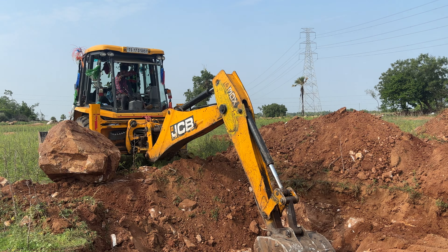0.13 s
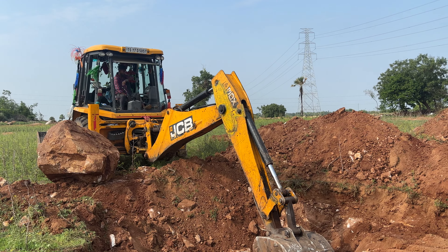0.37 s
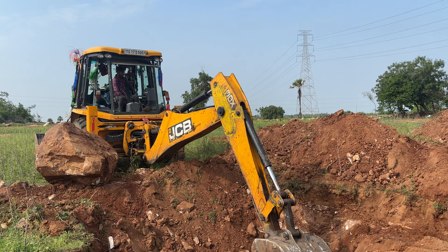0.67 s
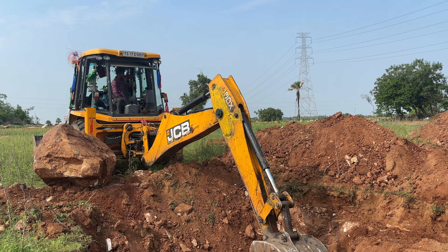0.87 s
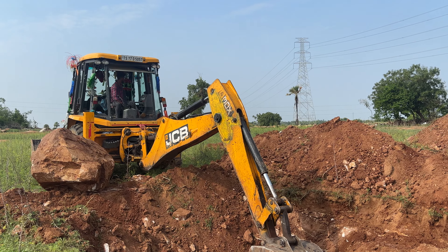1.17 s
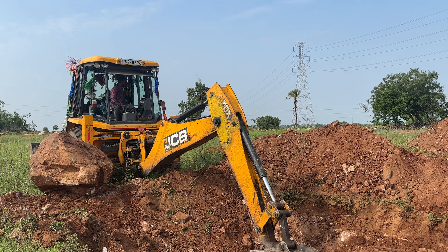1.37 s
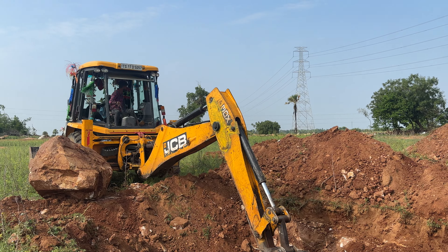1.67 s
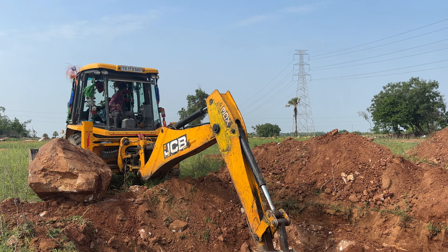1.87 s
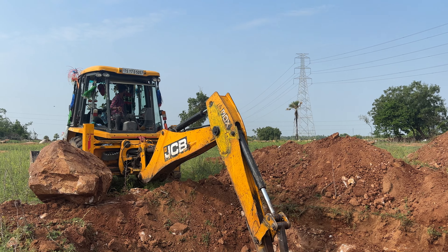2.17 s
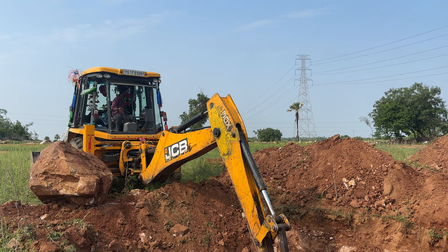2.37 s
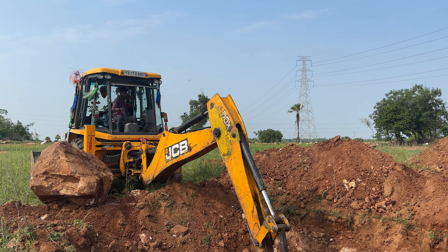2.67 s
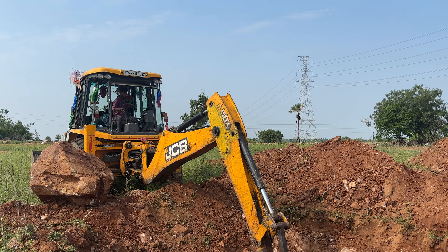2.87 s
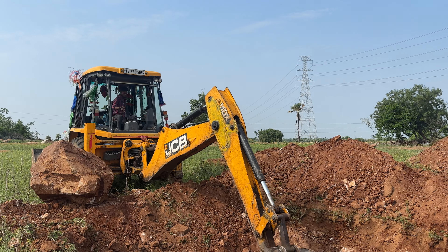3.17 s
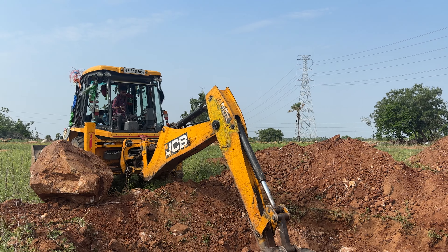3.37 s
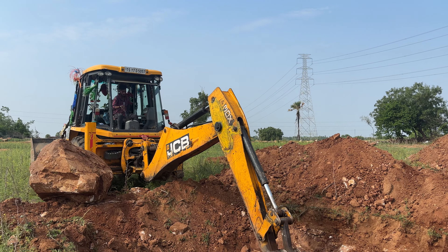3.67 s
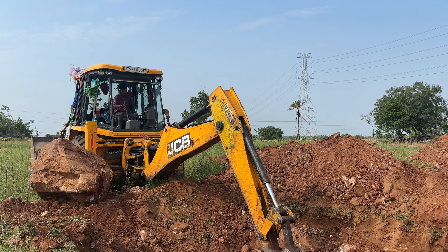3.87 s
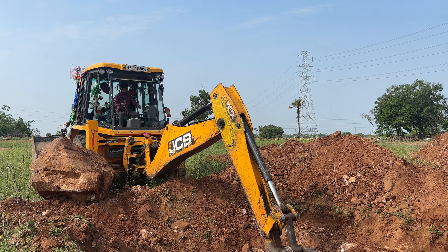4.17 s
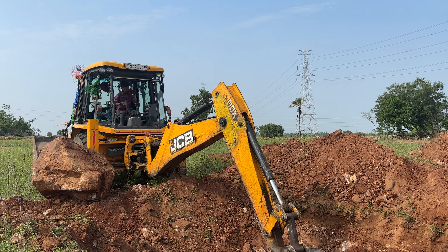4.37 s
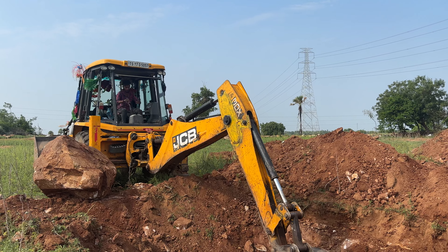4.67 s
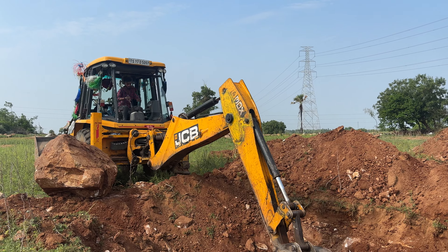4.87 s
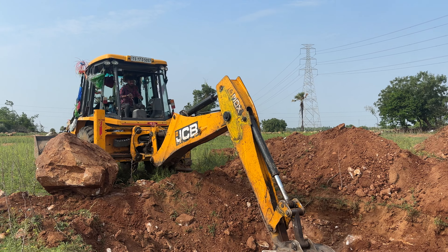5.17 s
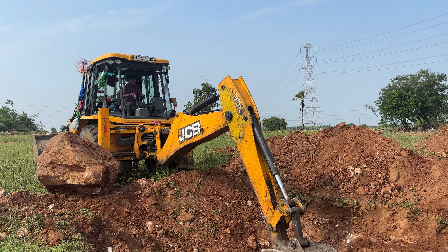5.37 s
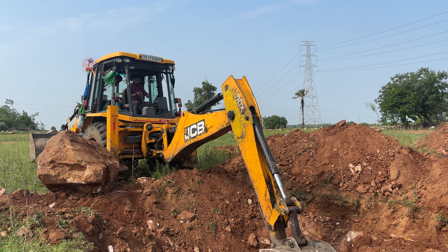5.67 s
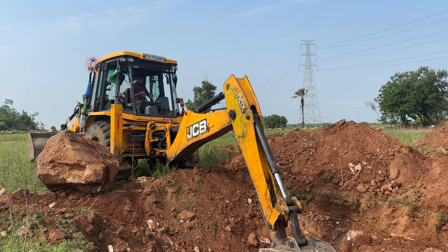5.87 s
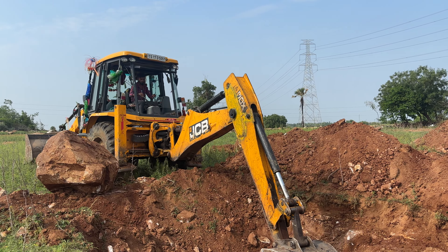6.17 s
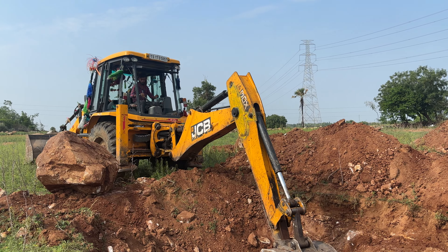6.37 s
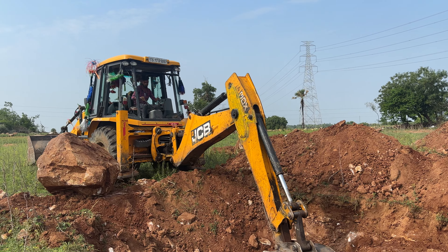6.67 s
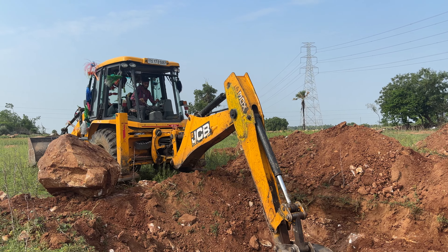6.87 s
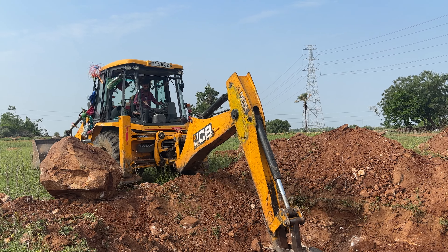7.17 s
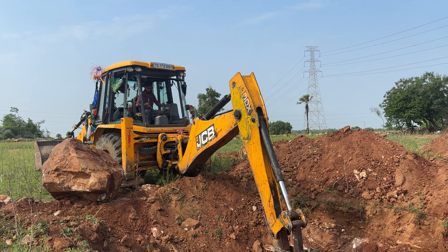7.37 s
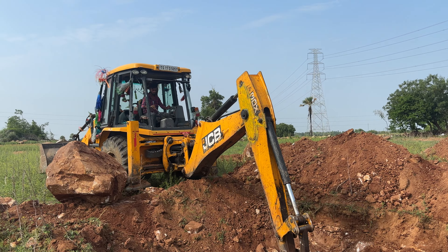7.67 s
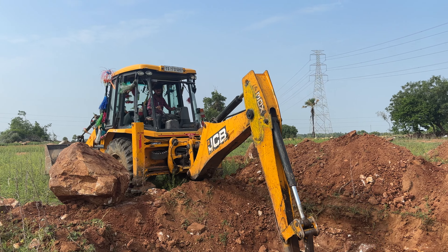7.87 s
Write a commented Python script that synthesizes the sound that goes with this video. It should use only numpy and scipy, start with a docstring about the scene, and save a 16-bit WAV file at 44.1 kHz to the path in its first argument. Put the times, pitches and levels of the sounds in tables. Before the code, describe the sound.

Gusty wind rumbles, thumps and slaps on a phone microphone in an open field for the whole eight seconds, and is the loudest sound. Beneath it, some way off, a diesel digger drones steadily with faint, shifting hydraulic whines. A soft rustle and a tick pass in the first two seconds, and near 2 seconds a thin, slightly wavering pump tone joins. After a light knock at about 3.7 seconds, the steel bucket hits rock in a quick cluster from 4.6 to 5.4 seconds, grinding and ringing, with two brief high squeaks. The engine is slightly louder from here. From about 5.5 seconds, small metal links clink lightly close by, mixed with faint, very high, short chirps until around 7.3 seconds. A few lighter bucket knocks fall between 7 and 8 seconds, as wind and engine continue.

```python
"""A diesel digger works a rock in an open field, some way from a phone held in gusty wind.
From the start, wind rumbles and slaps on both microphone ports while the engine drones and hydraulics whine.
A faint rustle and a tick pass early on, and near 2 s the main pump's gear tone joins in.
The steel bucket knocks on stone, hardest from 4.6 to 5.4 s, grinding, ringing and squeaking. Then small
metal links clink close by, something chirps thinly, and a few lighter knocks follow."""
import sys
import numpy as np
from scipy import signal
from scipy.fft import rfft, irfft
from scipy.io import wavfile
from scipy.ndimage import uniform_filter1d

SR = 44100
rng = np.random.default_rng(int(sys.argv[2]) if len(sys.argv) > 2 else 0)


def dump_mix(stems):
    """Bounce the given channels to the path in sys.argv[1] as a 16-bit WAV at rate SR."""
    frames = np.atleast_2d(stems).T  # one column per channel
    limited = np.clip(frames, -1, 1)  # hard clip at full scale
    pcm = np.round(limited * 32767).astype(np.int16)
    wavfile.write(sys.argv[1], SR, pcm)


N = 353329

# wind strength at the ports: time_s, rumble_db, roar_db
WIND_LEVELS = [(0.0, -29, -28), (0.36, -34.5, -42.5), (1.03, -25, -42), (1.2, -30.5, -26.5),
               (1.45, -32, -34.5), (1.72, -21.5, -30), (2.16, -25.5, -27), (2.27, -23.5, -30),
               (3.14, -24, -31.5), (3.41, -25.5, -30.5), (3.72, -25.5, -32), (4.42, -21, -25.5),
               (4.82, -20, -25.5), (5.08, -26, -37), (5.64, -22, -30.5), (5.73, -21, -29.5),
               (6.2, -25, -32.5), (6.4, -28.5, -37.5), (7.34, -31.5, -38.5), (8.01, -20.5, -31.5)]
# tone colour of the wind's low rumble and its higher roar: pitch_hz, level_db
RUMBLE_COLOUR = [(20, -15), (40, 3), (70, -3), (120, -1.5), (220, -6.5), (400, -24.5), (800, -75)]
ROAR_COLOUR = [(80, -62), (200, -9.5), (350, -4), (600, -9), (850, -14), (1300, -31.5), (2500, -85)]
# how alike the wind is left and right: pitch_hz, likeness (1 = the same)
WIND_LIKENESS = [(60, 0.17), (130, 0.43), (290, 0.69), (640, 0.92), (900, 0.63), (1400, 0.78)]
# lift or cut of the rumble's upper part: time_s, gain_db
UPPER_RUMBLE = [(0, 0), (.7, -1.5), (1.4, 1), (2.1, -2.5), (2.8, -1), (3.4, -3), (4, -8), (4.6, -1),
                (5.3, 3), (6, -0.5), (6.7, 5), (7.4, 3.5), (8, 0.5)]
# heavy, low shoves of air: time_s, peak_db, pitch_hz
WIND_BUFFETS = [(0.017, -24, 115), (0.993, -15, 61.9), (1.14, -24, 93), (1.46, -11, 90),
                (1.515, -10.5, 82.5), (1.655, -13.5, 123.6), (1.777, -19, 85.6), (2.248, -18, 59.2),
                (2.383, -7, 81.8), (2.684, -15, 61), (2.809, -22, 67.3), (3.194, -17, 62.3),
                (3.502, -14, 73), (3.928, -16, 49), (4.098, -17, 90), (4.3, -18, 153), (4.603, -12.5, 82.6),
                (4.678, -13, 115), (4.833, -11, 75.7), (5.268, -10, 128.4), (5.575, -16, 78.5),
                (5.8, -13, 72), (5.939, -24, 51.1), (6.039, -16, 77.5), (6.129, -20, 50.3),
                (6.176, -14, 53.5), (6.299, -9, 50.4), (6.359, -32, 166), (6.589, -19, 92),
                (6.884, -21, 83.4), (6.979, -17, 117), (7.04, -14, 53.8), (7.239, -20, 122),
                (7.648, -18, 73), (7.939, -21, 103)]
# strong eddies (swirls of air): start_s, level_db, pitch_hz, thump_db, snap_db (last two added to level)
STRONG_EDDIES = [(0.019, -23, 340, 0, -11), (0.123, -25, 384, -11, -5), (0.991, -16, 339, -9, -9),
                 (1.08, -23.5, 247, -1, -5), (1.152, -17, 510, -11, -4), (1.21, -24.5, 487, -4, -3),
                 (1.312, -24, 495, -14, 0), (1.381, -20, 450, -14, 4), (1.447, -20.5, 269, -9, 2),
                 (1.524, -9.5, 304, -10, -2.5), (1.659, -8, 318, -14, 6), (1.897, -17.5, 240, -7, -12),
                 (1.98, -13.5, 284, -18, -1), (2.014, -19, 400, -11, 7), (2.134, -15.5, 246, -4, 5),
                 (2.201, -30, 418, 6, -6.5), (2.244, -16, 296, -2, -16), (2.319, -14.5, 371, -15, 5.5),
                 (2.394, -19, 450, 3.5, -5), (2.486, -18.5, 470, -1, -5), (2.651, -15, 380, -17, -8),
                 (2.788, -18, 435, -3, -8), (2.899, -10, 520, -2, 1.5), (3.055, -18.5, 503, -7, 2),
                 (3.16, -18, 397, -3, -10), (3.211, -18.5, 520, 2, -3), (3.245, -15, 433, -14, -4),
                 (3.317, -16.5, 540, -10, -1), (3.358, -22, 470, -16, -9), (3.479, -15, 387, -14, -5),
                 (3.553, -10, 538, -13, 2.5), (3.616, -12.5, 415, -7, 5), (3.752, -27.5, 510, 11, -8),
                 (3.794, -17.5, 555, -4, -6.5), (3.936, -11.5, 547, -8, -5), (4.107, -14, 456, -9, -6.5),
                 (4.147, -18, 662, -6, 0), (4.227, -17, 594, -12, -1), (4.261, -14, 510, -9, -14),
                 (4.353, -12, 590, -18, 0), (4.405, -22, 545, -9, -6.5), (4.445, -8, 570, -6.5, -2),
                 (4.64, -19, 590, 4, -12), (4.787, -19.5, 415, -13, -10), (4.825, -15.5, 435, -10, 4),
                 (4.924, -13.5, 302, 4, -7), (5.058, -20.5, 315, 6, -6.5), (5.157, -11.5, 250, -20, -5),
                 (5.193, -12, 450, -8, -5), (5.262, -14, 480, -10, -5), (5.278, -10.5, 404, -5.5, 6),
                 (5.297, -11, 510, -10, 1), (5.305, -22, 500, -8, 3), (5.428, -16, 304, -1, -14),
                 (5.465, -13, 430, -18, -4), (5.555, -11, 510, -6, 8), (5.701, -16, 443, 2, -9),
                 (5.743, -10, 480, -22, -9), (5.829, -8.5, 570, -19, 0), (5.875, -16.5, 250, -22, 6),
                 (5.922, -9.5, 362, -10, -9), (6.101, -14, 224, 0, 5), (6.15, -16, 394, -5, -2),
                 (6.274, -18, 530, -7, 5), (6.364, -10.5, 262, -20, 0), (6.454, -14.5, 410, -5, -3),
                 (6.494, -17, 440, -2, 4.5), (6.613, -10.5, 268, -7, -1.5), (6.709, -18, 540, 0, 1),
                 (6.752, -14.5, 268, -4.5, -4), (6.891, -14, 230, -7, 2.5), (6.985, -12.5, 222, -13, 1),
                 (7.022, -17, 260, -6, 1), (7.182, -25, 760, -19, -11), (7.24, -14.5, 258, -4, 3.5),
                 (7.35, -19.5, 306, -3, -9), (7.499, -13.5, 269, -24, -11), (7.742, -16, 226, -22, -3),
                 (7.775, -17, 252, -19, -4), (7.932, -10.5, 224, -12, -6)]
# thin high chirps: start_s, length_s, level_db, pitch_hz
THIN_CHIRPS = [(5.535, .025, -58, 7870), (5.622, .012, -52, 8100), (5.66, .012, -50, 8150),
               (5.709, .012, -50, 8250), (5.738, 0.016, -40, 8120), (5.776, 0.014, -49, 8150),
               (5.895, .01, -51, 8400), (5.915, .035, -53, 8360), (5.966, .018, -51, 8260),
               (6.005, 0.009, -50, 8300), (6.048, .018, -47, 8260), (6.43, .04, -52, 8370),
               (6.561, 0.033, -41, 8180), (6.662, .014, -54, 8150), (6.822, .02, -54, 8200),
               (7.108, .035, -54, 8080), (7.154, .022, -50, 8200), (7.293, .016, -58, 8150)]
# clinks of the links: start_s, level_db, ring_hz, tick_db (added to level)
LINK_CLINKS = [(2.6656, -52, 7720, 22), (2.8168, -45, 8500, 2.5), (4.0915, -44, 7460, -3),
               (5.4562, -34.5, 9500, 4), (5.6894, -34, 9650, 7), (5.7048, -27, 9600, -9),
               (5.7398, -41, 9600, 8), (5.8507, -32, 9550, 5.5), (5.8808, -29, 9600, 2.5),
               (5.9831, -36, 9840, -8), (6.0050, -46, 9600, 6), (6.408, -31, 9600, 1),
               (6.5077, -33, 9600, 2), (6.647, -37, 9680, 4), (6.7719, -37, 9600, 2), (6.797, -38, 9600, 3),
               (6.804, -28, 9600, -8), (6.821, -38, 9720, 11), (6.9711, -42, 9590, 2),
               (7.2676, -36, 9610, -5), (7.575, -43, 9600, 6), (7.655, -37, 9500, 3),
               (7.8996, -43, 9900, 10), (7.9368, -41, 10060, 0)]
# squeaks of sliding steel: start_s, length_s, level_db
STEEL_SQUEAKS = [(4.765, 0.035, -45), (5.093, 0.051, -35)]
# resonances in a squeak: pitch_hz, width_hz, level_db
SQUEAK_RINGS = [(8200, 430, -2), (10000, 580, 1), (14600, 600, 3)]
# engine loudness: time_s, drone_db, hiss_db
ENGINE_LEVELS = [(0.0, -43.5, -56.5), (1.05, -45.5, -61), (2.56, -42.5, -62), (2.97, -41.5, -60),
                 (3.37, -43, -59), (4.01, -40, -58), (4.31, -43.5, -58), (4.77, -39, -55.5),
                 (5.26, -38.5, -53.5), (5.51, -40, -54.5), (6.27, -39, -53.5), (8.01, -40, -55)]
# tone colour of the engine's drone and hiss: pitch_hz, level_db
DRONE_COLOUR = [(180, -34), (300, 4.5), (472, -22), (630, -44), (723, -14.5), (864, -6), (1110, -1),
                (1400, -15), (1650, -13), (1860, -14), (2230, -15), (2390, -16), (2670, -16), (3660, -21),
                (8000, -36), (10400, -59), (17600, -120)]
HISS_COLOUR = [(4000, -3), (6000, -5.5), (8000, -2.5), (10000, -7), (12500, -2), (14500, -1.5),
               (15200, -10), (16000, -20)]
# how alike the drone is left and right: pitch_hz, likeness
DRONE_LIKENESS = [(300, 0.93), (1000, 0.48), (2000, 0.56), (3500, 0.2), (6000, 0.51), (8000, 0.75)]
# hydraulic whines, silent if the end is before the start: start_s, end_s, pitch_hz, width_hz, level_db
HYDRAULIC_WHINES = [(6.5, 8.1, 1300, 7.9, -61.5), (7, 10, 1100, 8.9, -49.5), (7, 9.3, 950, 11, -50),
                    (0.1, 2.5, 1688, 9.9, -60), (-0.2, 1.4, 1577, 16, -62), (0.9, 2.6, 2310, 50, -61.5),
                    (2, .8, 4500, 40, -54), (6.7, 8, 3596, 34, -54.5), (1, 2.1, 3990, 90, -70),
                    (-2, .7, 6350, 60, -70), (6.5, 8.1, 1900, 20, -65), (1.6, 1.8, 3800, 32, -60.5),
                    (0.8, 1, 1400, 16, -60), (1.2, 4.5, 2587, 17, -69.5), (4, 6.2, 1717, 11, -56),
                    (4, 6.5, 2100, 26, -59)]
# the main pump's gear tone, sagging under load: time_s, pitch_hz
PUMP_PITCH = [(1.8, 1133), (2.4, 1128), (2.6, 1113), (3.2, 1112), (3.6, 1095), (4.0, 1108), (5.4, 1108),
              (5.9, 1112), (6.5, 1108), (7.1, 1097), (8, 1097)]
# the gear tone and its next two overtones: level_db
PUMP_LEVELS = [-49.5, -59.5, -66]
# resonances of the bucket's steel shell: pitch_hz, width_hz, level_db
SHELL_RINGS = [(838, 32, 1), (927, 32, 3.5), (1261, 11, 4.5), (1595, 33, -6.5), (1730, 39, -0.5),
               (1990, 33, -4), (2227, 31, -6), (2400, 28, -9), (2560, 25, -17), (2840, 30, -11),
               (3140, 40, -2), (3400, 49, -1), (3940, 60, 2), (4200, 40, -3), (4380, 60, 0), (4690, 51, -2),
               (5140, 50, -2), (5370, 43, -4), (6100, 38, -7), (7250, 33, -7)]
# knocks and ticks: bucket on stone, plus a few faint early rustles, wind slaps and a tick:
# start_s, level_db, body_db, treble_db, ring_hz, decay_s, ring_db (added to level)
KNOCKS_AND_TICKS = [(0.4826, -45.5, 9, -10, 1920, 0.26, -10), (0.658, -42, 12, -13, 1800, 0.22, -12),
                    (0.689, -33, 20, 5.5, 1600, 0.33, -9), (1.187, -39.5, 23, 2, 2050, 0.18, -14),
                    (1.627, -46.5, 5, 18, 2270, .08, -12), (1.866, -44, -25, -29, 3020, 0.059, -12),
                    (2.801, -41, 0, -10, 1800, 0.22, -8), (3.6631, -30.5, -10, -12.5, 2400, 0.1, -10),
                    (3.898, -43, 13, -31, 2050, .07, -12), (3.982, -42, 7, -32, 2170, 0.093, -12),
                    (4.6278, -19.5, -22, -34, 2600, 0.12, -8), (4.631, -29.5, -16, -23, 2170, .15, -1),
                    (4.634, -19.5, -14, -25, 1610, 0.17, 0), (4.645, -25, -2, -22, 829, 0.098, 6),
                    (4.665, -22.5, -2, -23, 1241, 0.22, 1), (4.699, -23.5, -5, -20, 854, 0.13, -9),
                    (4.7433, -37, 1, -38, 1700, .11, -6), (4.776, -30.5, -3.5, -19, 2770, 0.17, -18),
                    (5.067, -36.5, -11, -37, 2650, 0.35, -6), (5.1047, -28, -7, -14, 2620, 0.2, -8),
                    (5.1451, -22, -9.5, -15, 2330, 0.12, -5), (5.147, -31, -7, -15, 3470, .08, 4),
                    (5.158, -38.5, 2, -21, 906, 0.14, 12), (5.192, -29, -2, -12.5, 4860, 0.091, -4),
                    (5.211, -31, -10, -10, 4230, 0.097, -2.5), (5.25, -23.5, -8.5, -12.5, 4700, 0.26, -18),
                    (5.258, -37, -6, -10, 5080, .1, 2), (5.27, -39, -6, -12, 2950, 0.088, 4),
                    (5.2848, -34, -1, 2, 3060, 0.12, 3.5), (5.326, -40, -20, -13, 3400, 0.073, 0),
                    (5.3538, -19, -13, -10.5, 4430, 0.14, -10), (5.362, -30, -14, -15, 3510, .1, 5),
                    (6.922, -43.5, -27, -25, 2380, 0.09, -3), (7.176, -34, -1, -33, 1720, 0.13, -11),
                    (7.28, -44.5, -25, -14, 3050, .11, -4), (7.444, -42, -17, -15, 2070, 0.44, -8),
                    (7.4754, -35, -4.5, -16, 2100, 0.18, -2), (7.935, -40.5, -14, 1, 2260, 0.21, -4)]
# how far the right port lags the left: pitch_hz, lag_cycles
PORT_LAG = [(0, .3), (300, .25), (500, .06), (1300, .1), (1600, -.14), (2000, -.12), (2500, .04),
            (4400, .06), (5600, -.15), (6800, 0), (8000, -.15), (9800, -.5), (12400, -1), (13400, -1.07),
            (15300, -1.5)]
# how much louder the left port is than the right: pitch_hz, pan_db
PORT_BALANCE = [(60, 1), (110, -0.5), (200, -1.5), (380, -2.0), (700, 2), (1290, 2.5), (2380, 0.5),
                (4400, 2), (8120, -0.5), (15000, 0.5)]

GUST_DB, GUST_MS, SWAY_DB = 4.5, 42, 3.5  # short gusts and lulls; drift between the ports
BUFFET_RISE_S, BUFFET_FALL_S = 0.0093, 0.027
EDDIES_PER_S, EDDY_HZ, EDDY_S = 7, 380, 0.027
FIRING_HZ, EXHAUST_DB = 42.36, -35
GRIND_S, KNOCK_RISE_S = 0.0072, 0.0035
CLINK_FADE_S, TICK_FADE_S, RING_FADE_CYCLES = 0.022, 0.006, 480  # each to fall by 60 dB
BASS_CUT_HZ, TOP_CUT_HZ = 44, 15800


def gain_of(db):
    """Turns decibels into a factor to multiply by."""
    return 10 ** (np.asarray(db) / 20)


def evened(x):
    """Scales a signal to an average power of 1."""
    return x / np.sqrt(np.mean(x ** 2) + 1e-20)


def at_pitch(rows, hz):
    """Reads a two-column table at the given pitches."""
    pitches, values = np.transpose(rows)
    return np.interp(np.log(hz + 1), np.log(pitches + 1), values)


def at_time(rows, t):
    """Reads each column of a timed table at the given times."""
    times, *columns = np.transpose(rows)
    return [np.interp(t, times, column) for column in columns]


def sides(pan_db):
    """Left and right gains; a positive pan leans left."""
    return gain_of(np.array([pan_db / 2, -pan_db / 2]).reshape(2, -1))


def add(mix, start_s, sound):
    """Mixes a sound in at its start time."""
    part = mix[..., max(round(start_s * SR), 0):][..., :sound.shape[-1]]
    part += sound[..., :part.shape[-1]]


def resonate(x, hz, width_hz):
    """A resonance: shifts hz down to zero, smooths, and shifts back."""
    spin = np.exp(2j * np.pi * np.cumsum(hz * np.ones(x.shape[-1])) / SR)
    hold = np.exp(-np.pi * width_hz / SR)
    return 2 * (spin * signal.lfilter([1 - hold], [1, -hold], x / spin + 1e-18)).real


def wobble(ms):
    """Two smooth random curves that change over about ms."""
    size = max(int(ms * SR / 1000), 1)
    return evened(uniform_filter1d(uniform_filter1d(rng.standard_normal((2, N)), size), size))


def noise(colour, likeness, patchy_db, size=(8, 10)):
    """Coloured stereo noise with drifting loud and soft patches (size: pitch bins, time frames)."""
    frames, hz = N // 256 + 5, np.fft.rfftfreq(1024, 1 / SR)
    a, b, c, d, patches = rng.standard_normal((frames, 513, 5)).T
    patches = evened(uniform_filter1d(uniform_filter1d(patches, size[0], 0), size[1], 1))
    alike = np.clip(at_pitch(likeness, hz), -1, 1)[:, None]
    left, unrelated = a + 1j * b, c + 1j * d
    spectrum = np.array([left, alike * left + np.sqrt(1 - alike ** 2) * unrelated])
    spectrum *= gain_of(at_pitch(colour, hz)[:, None] + patchy_db * patches)
    return evened(signal.istft(spectrum, nperseg=1024, noverlap=768)[1][:, :N])


def wind():
    """Air on the ports makes a lumpy rumble and a roar that breaks into puffs; both come in gusts."""
    t = np.arange(N) / SR
    rumble_db, roar_db = at_time(WIND_LEVELS, t)
    gust_db, pan_db = [[GUST_DB], [SWAY_DB]] * np.minimum(wobble(ms=GUST_MS), 1.3)
    rumble = noise(RUMBLE_COLOUR, WIND_LIKENESS, patchy_db=-2) * evened(gain_of(2.6 * wobble(ms=15.5)))
    upper = signal.sosfilt(signal.butter(2, 138, "high", fs=SR, output="sos"), rumble)
    rumble += (gain_of(at_time(UPPER_RUMBLE, t)[0]) - 1) * upper
    puffs = wobble(ms=5.5)
    puffs_db = 4.94 / 0.42 * np.tanh(0.32 * evened(puffs + 2 * puffs.mean(0)))
    roar = noise(ROAR_COLOUR, WIND_LIKENESS, patchy_db=0.5) * evened(gain_of(puffs_db + gust_db))
    return sides(pan_db) * (gain_of(rumble_db + 0.69 * gust_db) * rumble + gain_of(roar_db) * roar)


def buffets():
    """Each shove of air is a low, wobbling tone that rises fast and falls slower."""
    out, t = np.zeros((2, N)), np.arange(0, .25, 1 / SR)
    shape = (1 - np.exp(-(t / BUFFET_RISE_S) ** 2)) * np.exp(-t / BUFFET_FALL_S)
    for start_s, db, hz in WIND_BUFFETS:
        phase, waver_phase, offset = rng.random(3)
        cycles = hz * t + phase + 0.13 * np.sin(2 * np.pi * (17 * t + waver_phase))
        tone = np.sin(2 * np.pi * (cycles + [[0], [0.33 * (offset - .5)]]))  # ports are out of step
        add(out, start_s - BUFFET_RISE_S / 2, gain_of(db) * shape / shape.max() * tone)
    return out


def small_eddies():
    """Rows for random small eddies: level follows the roar, pitch partly follows the strong eddies."""
    count = round(N / SR * EDDIES_PER_S)
    times = rng.uniform(0, N / SR, count)
    level_luck, pitch_luck, thump_luck = rng.standard_normal((count, 3)).T
    db = at_time(WIND_LEVELS, times)[1] + 10 + 4.5 * level_luck
    strong_hz = uniform_filter1d(at_time(STRONG_EDDIES, np.arange(0, N / SR, .05))[1], size=9)
    hz = np.sqrt(EDDY_HZ * strong_hz[(times / .05).astype(int)]) * np.exp(0.19 * pitch_luck)
    thump_db, snap_db = -7.5 + 2.1 * thump_luck, np.full(count, -21)
    return zip(times, db, hz, thump_db, snap_db)


def eddy_slaps():
    """Each eddy slaps the ports with a few ragged cycles that sink in pitch, plus a low thump."""
    out = np.zeros((2, N))
    for start_s, db, hz, thump_db, snap_db in [*small_eddies(), *STRONG_EDDIES]:
        stretch, sway = rng.standard_normal(2)
        length = int(np.clip(EDDY_S * np.exp(0.17 * stretch), .006, .06) * SR)
        progress = np.linspace(0, 1, length)
        shared, own = rng.standard_normal((2, 2, 3000))[..., :length]
        alike = np.clip(0.93 * np.log2(hz / 270), .3, .95)  # high eddies strike both ports alike
        air = np.sqrt(alike) * shared[0] + np.sqrt(1 - alike) * own
        sinking_hz = hz * (1.2 - .45 * progress)
        swell = np.sin(np.pi * progress ** .8) ** 2
        slap = swell * resonate(resonate(air, sinking_hz, 0.5 * hz), sinking_hz, 0.43 * hz)
        thump = swell * np.sin(2 * np.pi * (1.91 * progress + rng.random() + [[0], [.084 + .15 * sway]]))
        edge = (progress * length / SR - .005) / 0.00041  # the front arrives as one sharp swing
        snap = gain_of(snap_db) * rng.choice([-1, 1]) * edge * np.exp(-edge ** 2 / 2)
        pan_db = 7.5 * (1 - alike) * sway - 2.3 * np.log2(hz / 400)  # higher eddies lean right
        eddy = slap / abs(slap).max() + snap + gain_of(thump_db) * thump
        add(out, start_s - .004, sides(pan_db) * gain_of(db) * eddy)
    return signal.sosfilt(signal.butter(2, 1500, fs=SR, output="sos"), out)


def chirps():
    """Each chirp is a soft, slightly fuzzy tone that climbs a little."""
    out = np.zeros(N)
    for start_s, length_s, db, hz in THIN_CHIRPS:
        progress = np.linspace(0, 1, int(length_s * SR))
        rising_hz = hz * (1 + 0.033 * (progress - .5))
        tone = np.sin(2 * np.pi * np.cumsum(rising_hz) / SR)
        fuzz = evened(resonate(rng.standard_normal(3000)[:len(tone)], rising_hz, width_hz=120))
        add(out, start_s, gain_of(db) * np.sin(np.pi * progress ** .7) * (tone + .4 * fuzz))
    return out


def links():
    """Small metal links clink: a tick and one short, high ring."""
    out, t = np.zeros(N), np.arange(3000) / SR
    for start_s, db, hz, tick_db in LINK_CLINKS:
        ring = gain_of(-60 * t / CLINK_FADE_S) * np.sin(2 * np.pi * hz * t)
        tick = resonate(rng.standard_normal(len(t)), hz=9500, width_hz=5000)
        add(out, start_s, gain_of(db) * (ring + tick * gain_of(tick_db - 60 * t / TICK_FADE_S)))
    return out


def squeaks():
    """Sliding steel squeaks: rubbing noise passes through high resonances."""
    out = np.zeros(N)
    for start_s, length_s, db in STEEL_SQUEAKS:
        rub = rng.standard_normal(4000)[:int(length_s * SR)]
        squeal = sum(gain_of(ring_db) * resonate(rub, hz, width) for hz, width, ring_db in SQUEAK_RINGS)
        add(out, start_s, gain_of(db) * evened(squeal) * signal.windows.tukey(len(rub), .7))
    return out


def engine():
    """The diesel's clatter swells at each uneven firing, over an exhaust hum and a hiss."""
    drone_db, hiss_db = at_time(ENGINE_LEVELS, np.arange(N) / SR)
    firings = np.cumsum(FIRING_HZ * (1 + .03 * wobble(ms=60)[0])) / SR
    pulses = evened(1 + 1.4 * np.exp(-(firings % 1) / 0.76))
    drone = pulses * noise(DRONE_COLOUR, DRONE_LIKENESS, patchy_db=2.5, size=(2, 50))
    drone *= gain_of(drone_db + wobble(ms=43)[0])
    exhaust = gain_of(EXHAUST_DB) * np.sin(4 * np.pi * firings)  # the pipe favours twice the firing rate
    hiss = noise(HISS_COLOUR, likeness=[(8000, .95), (13000, .9)], patchy_db=.6)
    return drone + exhaust + gain_of(hiss_db + 1.7 * wobble(ms=18)[0]) * hiss


def hydraulics():
    """The hydraulics whine: narrow bands of noise that waver like unsteady tones."""
    out, t = np.zeros((2, N)), np.arange(N) / SR
    for start_s, end_s, hz, width_hz, db in HYDRAULIC_WHINES:
        fade = np.clip(np.minimum(t - start_s, end_s - t) / 0.019, 0, 1)
        rush = rng.standard_normal(N) + 0.81 * rng.standard_normal((2, N))
        out += fade * gain_of(db) * evened(resonate(rush, hz, width_hz))
    return out


def pump(start_s=1.8, end_s=7.6):
    """The main pump's gears make a tone with overtones, unsteady in pitch and level."""
    t = np.arange(N) / SR
    cycles = np.cumsum(at_time(PUMP_PITCH, t)[0] * (1 + .002 * wobble(ms=40)[0])) / SR
    fade = np.clip(np.minimum(t - start_s, end_s - t) / .2, 0, 1)
    return fade * sum(gain_of(db + 4.3 * wobble(ms=130)) * np.sin(2 * np.pi * harmonic * cycles)
                      for harmonic, db in enumerate(PUMP_LEVELS, start=1))


def steel_shell(hz, ring_hz):
    """Tone colour of one knock: the shell's rings and a broad crack, both lifted near ring_hz."""
    rings = 0
    for pitch_hz, width_hz, db in SHELL_RINGS:
        luck_db = 3 * rng.standard_normal()  # each knock wakes other rings
        lift_db = 7 * np.exp(-(np.log(pitch_hz / ring_hz) / .15) ** 2)
        rings += gain_of(db + luck_db + lift_db) * width_hz / (width_hz + 2j * (hz - pitch_hz))
    crack = 0.95 * gain_of(3 * np.exp(-(np.log((hz + 1) / ring_hz) / 0.27) ** 2))
    return rings + crack


def knocks_and_ticks():
    """Gritty bursts with a ringing tail: bucket on stone, plus early rustles, wind slaps and a tick."""
    out, t, hz = np.zeros((2, N)), np.arange(8192) / SR, np.fft.rfftfreq(8192, 1 / SR)
    rise = np.minimum(t / KNOCK_RISE_S, 1)
    fade_out = signal.windows.tukey(2 * len(t))[len(t):]
    lows, highs = 1 / (1 + (hz / 3000) ** 2), 1 / (1 + (3000 / (hz + 1)) ** 2)
    for start_s, db, body_db, treble_db, ring_hz, decay_s, ring_db in KNOCKS_AND_TICKS:
        colour = [(400, body_db + 15), (1100, body_db + 9.5), (2400, 0.022),
                  (5300, treble_db + 3), (9000, treble_db - 5), (15000, treble_db - 25)]
        shell = steel_shell(hz, ring_hz) * gain_of(at_pitch(colour, hz))
        shared, own = rng.standard_normal((2, 2, len(t)))
        grit = (shared[0] + 0.54 * own) * gain_of(1.6 * rng.standard_normal(128)).repeat(64)
        fall_db = -60 * np.maximum(t - GRIND_S, 0) / decay_s
        dull = irfft(rfft(grit * gain_of(fall_db)) * shell * lows)
        bright = irfft(rfft(grit * gain_of(1.8 * fall_db)) * shell * highs)  # treble dies first
        burst = (dull + bright) * rise * (t < .17)
        burst *= 2 * np.pi * 2200 / SR / np.std(np.diff(burst[:, :700]))  # even out the attack strength
        pair = np.sin(2 * np.pi * ring_hz * t)
        pair += .4 * np.sin(2 * np.pi * (1.004 * ring_hz * t + rng.random()))
        ring = gain_of(ring_db - 60 * t * ring_hz / RING_FADE_CYCLES) * rise * pair * fade_out
        add(out, start_s - .0015, sides(pan_db=-0.5) * gain_of(db) * (burst + ring))
    return out


def scene():
    """Adds up the wind, the machinery, the knocks and the small high sounds."""
    air = wind() + buffets() + eddy_slaps()
    machinery = engine() + hydraulics() + pump()
    return air + machinery + knocks_and_ticks() + links() + squeaks() + chirps()


def record(dry):
    """Sound bends round the phone, so its ports differ; deep bass and top are cut, and peaks soften."""
    hz = np.fft.rfftfreq(N, 1 / SR)
    lag_cycles = np.interp(hz, *np.transpose(PORT_LAG))
    right = irfft(rfft(dry[1]) * np.exp(-2j * np.pi * lag_cycles), N)
    ports = irfft(rfft(np.array([dry[0], right])) * sides(at_pitch(PORT_BALANCE, hz)), N)
    bass_cut = signal.sosfilt(signal.butter(6, BASS_CUT_HZ, "high", fs=SR, output="sos"), ports)
    softened = np.tanh(bass_cut / 1.1) * 1.1
    top_filter = signal.firwin(511, TOP_CUT_HZ, window=("kaiser", 9), fs=SR)
    return signal.oaconvolve(softened, top_filter[None], "same")


dry = scene()
out = record(dry)
dump_mix(out)
```